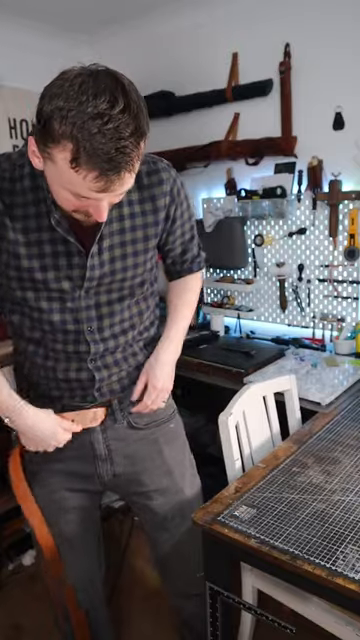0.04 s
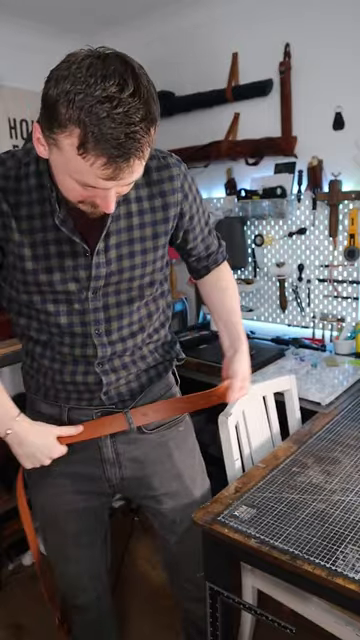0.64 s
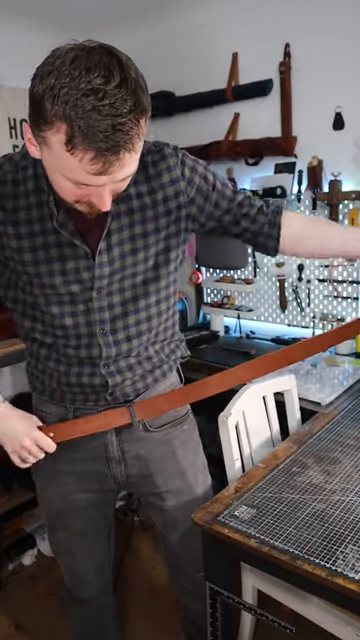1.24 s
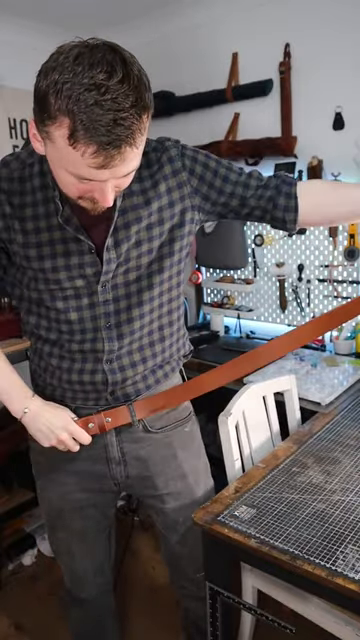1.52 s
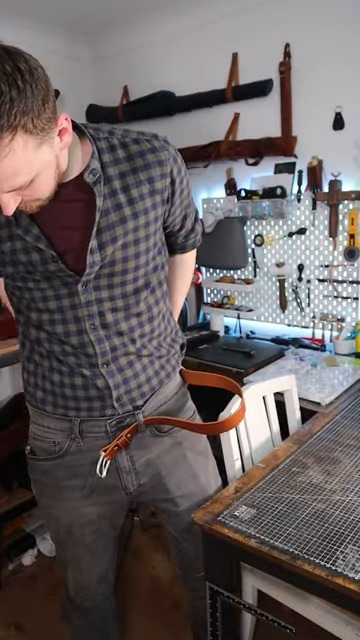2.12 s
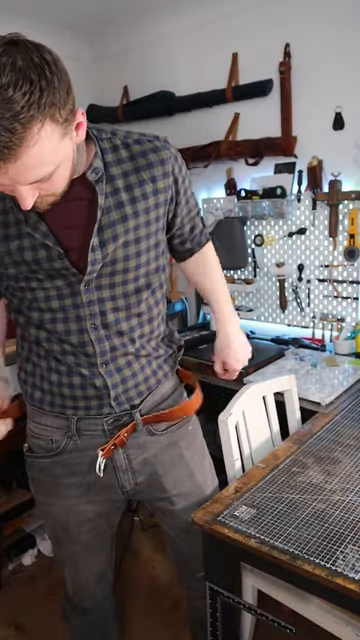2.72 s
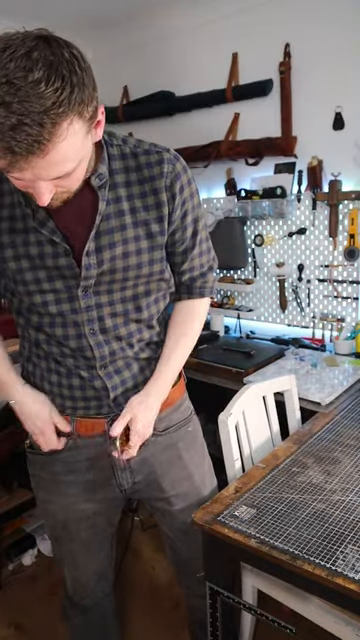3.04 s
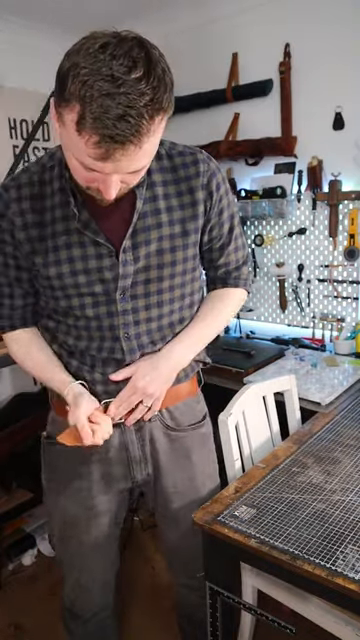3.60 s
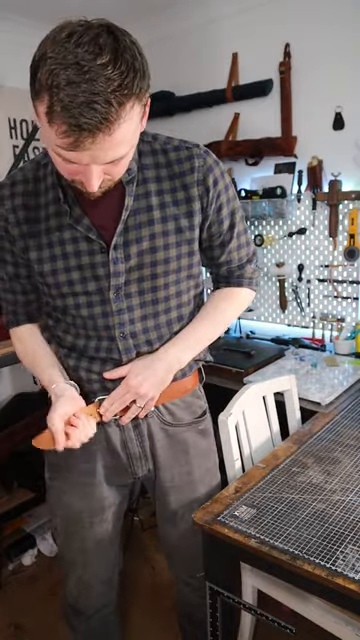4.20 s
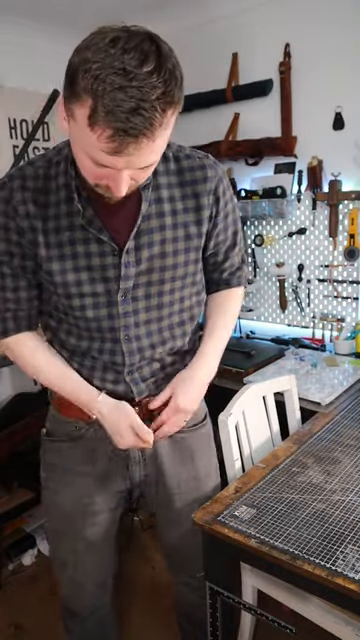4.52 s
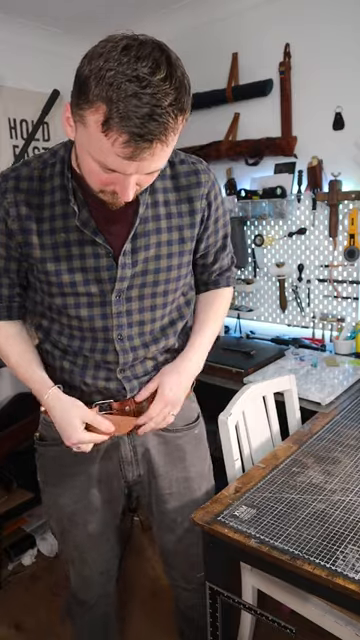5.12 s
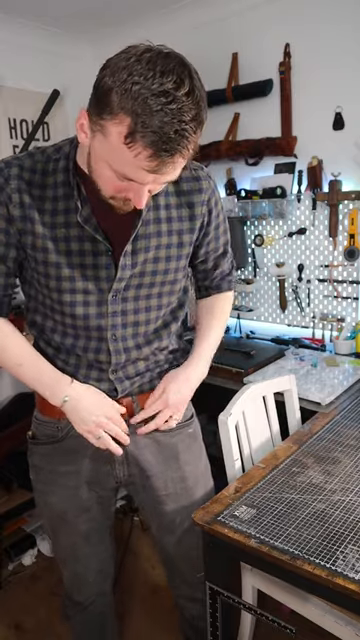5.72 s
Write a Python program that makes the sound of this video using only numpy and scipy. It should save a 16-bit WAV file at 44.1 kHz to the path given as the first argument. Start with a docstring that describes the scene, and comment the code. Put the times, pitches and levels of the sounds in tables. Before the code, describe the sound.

A leather belt swishes through the loops of jeans, its buckle clinking, then creaks as it is pulled tight.

```python
"""A leather belt is threaded through a pair of jeans and buckled, in a small, quietly humming workshop.
First hands brush the cloth, then the strap swishes and zips over the ribbed denim. Around one second
in, the dangling buckle clinks against its prong. More pulls follow, with soft pats and snaps of
leather. Around four seconds the belt is pulled tight: it sticks and slips in a run of creaks, and
the buckle clinks again. A few last pats, brushes and creaks end the scene."""
import sys
import numpy as np
from scipy import signal
from scipy.fft import rfft, irfft
from scipy.io import wavfile

SR = 44100
rng = np.random.default_rng(int(sys.argv[2]) if len(sys.argv) > 2 else 0)


def master(y):
    """Save y as 16-bit WAV."""
    cut = np.clip(np.atleast_2d(y).T, -1, 1)
    pcm = np.round(cut * 32767)  # scale
    wavfile.write(sys.argv[1], SR, pcm.astype(np.int16))


N = 253575
TIME = np.arange(N) / SR


def from_db(db):
    """Turn decibels into a number to multiply a sound by."""
    return 10 ** (np.asarray(db) / 20)


def rms_one(x):
    """Scale a signal so that its average size (rms) is 1."""
    return x / np.sqrt(np.mean(x ** 2) + 1e-20)


def at_hz(points, hz):
    """Read between the rows of a (pitch, value) table, with octaves evenly spaced."""
    known_hz, values = np.transpose(points)
    return np.interp(np.log(hz + 1e-9), np.log(known_hz), values)


def coloured(x, spectrum):
    """Shape the lows and highs of a signal by a (pitch, level) table; the result has rms 1."""
    gain = from_db(at_hz(spectrum, np.fft.rfftfreq(N, 1 / SR)))
    return rms_one(irfft(rfft(x) * gain, N))


def band(x, low_hz, high_hz, order=2):
    """Keep the part of a sound that lies between two pitches."""
    edges_hz = [low_hz, min(high_hz, SR * 4 / 9)]
    return signal.sosfilt(signal.butter(order, edges_hz, "band", fs=SR, output="sos"), x)


def drift(per_s):
    """A random wobble of rms 1 that heads for a new value per_s times a second."""
    return rms_one(np.interp(TIME * per_s, np.arange(N), rng.standard_normal(N)))


def add(track, start_s, sound):
    """Mix a sound into a track at the given time."""
    at = int(round(start_s * SR))
    track[at:at + len(sound)] += sound[:N - at]


def quiet_room(air_db, waver_db):
    """Something electrical hums, wavering a little, over the steady noise of the air."""
    # Tone colour of the air noise: pitch_hz, level_db
    air_spectrum = [(20, -19), (45, -14), (70, -0.5), (100, 10), (160, 6), (300, 4), (600, -0.5),
                    (1200, -8.5), (2400, -8.5), (3300, -6.5), (5000, -13), (10000, -22), (16000, -33)]
    # Tones of the electrical hum: pitch_hz, level_db
    hum_tones = [(115.2, -69.5), (161, -81.5), (231.5, -80)]
    swell_db = waver_db * drift(10)
    sway = .3 * drift(3)
    hum = sum(from_db(db + swell_db) * np.sqrt(2) * np.sin(2 * np.pi * hz * TIME + sway)
              for hz, db in hum_tones)
    return hum + from_db(air_db) * coloured(rng.standard_normal(N), air_spectrum)


def workshop_echo(x, gap_s, early_db, early_fade_s):
    """The nearby bench and walls throw back many quick echoes; high pitches die away first."""
    # Time the room's echo takes to fall by 60 dB: pitch_hz, fade_s
    fade_times = [(100, 1), (1000, 0.31), (3500, 0.25), (8000, 0.22), (16000, 0.16)]
    centres_hz, fades_s = np.transpose(fade_times)
    t = TIME[:SR // 2]
    scatter = rfft(rng.standard_normal(len(t)))
    hz = np.fft.rfftfreq(len(t), 1 / SR)
    early = from_db(early_db - 60 * t / early_fade_s)
    echo = np.zeros(len(t))
    for share, fade_s in zip(np.eye(len(fades_s)), fades_s):
        weight = at_hz(np.c_[centres_hz, share], hz)   # picks out one range of pitches
        echo += irfft(scatter * weight, len(t)) * (from_db(-60 * t / fade_s) + early)
    echo *= np.clip(t / gap_s - 1, 0, 1)   # silent until the first echo is back
    return signal.fftconvolve(x, echo / np.sqrt(np.sum(echo ** 2)))[:N]


def pats(spread):
    """A soft pat crushes the cloth and makes a dull puff that dies quickly."""
    # Hand and strap landing on the body: start_s, level_db, pitch_hz, fade_s (to fall by 60 dB)
    touches = [(.457, -48.5, 580, .08), (.515, -57, 450, .05), (.935, -49, 150, .15), (1.141, -56, 330, .2),
               (2.712, -48, 1300, .14), (2.915, -43, 580, .08), (2.926, -51, 250, .13),
               (3.251, -53, 500, .05), (3.385, -50.5, 750, .09), (5.501, -52, 800, .05),
               (5.526, -47, 700, .06), (5.545, -50, 700, .08), (5.673, -55, 550, .08)]
    out, t = np.zeros(N), TIME[:SR // 2]
    fade_in = 1 - np.exp(-t / 0.001)
    for start_s, level_db, hz, fade_s in touches:
        puff = rms_one(band(rng.standard_normal(len(t)), hz / spread, hz * spread))
        add(out, start_s, from_db(level_db - 60 * t / fade_s) * puff * fade_in)
    return out


def stroke(peak_s, rise_s, fall_s, edge_db=12):
    """Loudness of one movement that speeds up and slows down; edge_db lower at both ends."""
    before = (np.maximum(peak_s - TIME, 0) / rise_s) ** 1.56   # a power of 2 would give a bell shape
    after = (np.maximum(TIME - peak_s, 0) / fall_s) ** 1.31
    return from_db(-np.minimum(edge_db * (before + after), 120))


def friction_levels():
    """Levels of cloth, strap and weave in dB over time: every pull or brush stirs all three."""
    # The strap is pulled over the denim: peak_s, rise_s, fall_s, swish_db, hiss_db
    pulls = [(.57, .1, .1, -59.5, -68), (.77, 0.19, 0.28, -53.5, -48.5), (.93, 0.098, 0.17, -42.5, -53),
             (1.35, 0.078, 0.17, -53.5, -57.5), (1.56, .015, 0.13, -58, -66.5),
             (1.87, 0.068, .06, -61, -67.5), (2.23, 0.06, 0.034, -61.5, -75),
             (2.465, 0.098, 0.066, -47, -58.5), (2.91, 0.13, 0.039, -48, -58),
             (2.99, 0.077, .012, -56.5, -60), (3.125, 0.029, 0.084, -54.5, -76),
             (3.605, 0.082, 0.077, -64.5, -62), (3.85, 0.091, .08, -61.5, -66), (4.35, .06, 0.24, -62, -86),
             (4.63, 0.041, 0.08, -58.5, -60.5), (5.555, 0.047, 0.067, -50.5, -74)]
    # Hands brush shirt and jeans: peak_s, rise_s, fall_s, rustle_db
    brushes = [(.09, .1, 0.11, -64), (.285, 0.066, 0.12, -55.5), (.39, 0.12, 0.18, -57.5),
               (.95, 0.11, 0.088, -50.5), (1.43, 0.36, 0.13, -62.5), (2.0, 0.064, 0.095, -61.5),
               (2.57, 0.071, 0.17, -65), (2.8, 0.14, .1, -65), (2.925, 0.016, 0.052, -48),
               (3.1, 0.04, .05, -58.5), (3.2, 0.096, 0.14, -57.5), (3.3, 0.027, 0.028, -59.5),
               (3.41, 0.11, 0.056, -60), (3.535, 0.055, 0.01, -56.5), (3.84, 0.052, 0.18, -60),
               (4.02, .04, 0.22, -68), (4.52, 0.17, 0.24, -64.5), (4.9, 0.11, 0.17, -75),
               (5.38, 0.27, 0.16, -65), (5.57, 0.066, 0.087, -61), (5.69, .02, 0.054, -59)]
    # each list of three levels runs: cloth rustle, strap swish, weave hiss
    movements = [(timing, [db - 11.5, db, hiss_db]) for *timing, db, hiss_db in pulls]
    movements += [(timing, [db, db - 1, db - 6]) for *timing, db in brushes]
    power = from_db([[-74], [-74.5], [-75]]) ** 2   # the clothes are never quite still
    for timing, levels_db in movements:
        power = power + np.outer(from_db(levels_db), stroke(*timing)) ** 2
    return 10 * np.log10(power)


def friction(spectrum, grain_db, grains_per_s, flutter_db):
    """Fibres catch and let go in tiny bursts, while the pressure of the hand flutters."""
    noise = rng.standard_normal(N)
    bursts_db = grain_db * np.minimum(drift(grains_per_s), 3)
    pressure_db = flutter_db * drift(70)
    return coloured(noise * from_db(bursts_db + pressure_db), spectrum)


def rubbing(crackle_db):
    """Loose cloth rustles low, the strap swishes through the loops and the weave hisses high."""
    # Tone colours of these three kinds of rubbing: pitch_hz, level_db
    cloth_tone = [(40, -19), (90, -7), (200, -2.5), (350, 1.5), (600, 2), (1100, 1.5), (1700, -3.5),
                  (3000, -22), (8000, -61)]
    strap_tone = [(300, -22), (900, -12.5), (1400, -2.5), (1900, -1.5), (2500, -1.5), (3300, -2.5),
                  (4100, -5.5), (5000, -10), (7000, -16), (16000, -32)]
    weave_tone = [(2000, -7.5), (4000, 4), (5500, -1), (7500, -0.5), (10000, -5), (13000, -8),
                  (16000, -11.5)]
    cloth_db, strap_db, weave_db = friction_levels()
    cloth = from_db(cloth_db + 0.02) * friction(cloth_tone, 2.5, grains_per_s=600, flutter_db=1.03)
    strap = from_db(strap_db - 2.5) * friction(strap_tone, 1.0, grains_per_s=1300, flutter_db=1.5)
    weave = from_db(weave_db - 1.6) * friction(weave_tone, 1.5, grains_per_s=4500, flutter_db=1.36)
    slips = (rng.random(N) < 90 / SR) * rng.standard_normal(N)   # about 90 a second
    # single slips stand out only while the strap creeps; at speed the swish covers them
    slip_db = np.minimum(strap_db, -59) + crackle_db
    crackle = from_db(slip_db) * rms_one(band(slips + 1e-18, 1440, 5900))
    return cloth + strap + weave + crackle


def zipping(jitter, octave_db, smear):
    """Denim ribs pass unevenly under the strap: a hissy tone, with a rougher one an octave up."""
    # The strap at full speed over the ribs: time_s, ribs_per_s, level_db
    slide = [(.58, 1650, -73), (.67, 1650, -63.5), (0.721, 1840, -59), (.775, 1890, -58), (0.82, 1700, -67),
             (.9, 1700, -70)]
    time_s, ribs_per_s, level_db = np.transpose(slide)
    pitch_hz = np.interp(TIME, time_s, ribs_per_s) * (1 + jitter * drift(1500))
    phase = 2 * np.pi * np.cumsum(pitch_hz) / SR
    loudness = np.interp(TIME, time_s, from_db(level_db), left=0, right=0)
    flicker = 1 + 0.16 * drift(280)
    octave = from_db(octave_db) * np.sin(2 * phase + smear * drift(1400))
    return loudness * flicker * (np.sin(phase) + octave)


def small_creaks(count, from_s, to_s):
    """Faint creaks come unevenly as the belt tightens; gives rows of start_s, level_db, pitch_hz."""
    time_luck, level_luck, pitch_luck = rng.standard_normal((count, 3)).T
    start_s = np.linspace(from_s, to_s, count) + time_luck * (to_s - from_s) / count / 2
    level_db = -47 + 2.0 * level_luck
    pitch_hz = 3700 * 2 ** (.2 * np.clip(pitch_luck, -2, 2))
    return list(zip(start_s, level_db, pitch_hz))


def creaks(spread, gain_db, edge_db):
    """Leather sticks, then slips in one very short jolt with a faint bright edge."""
    # Loud creaks and snaps over loops and buckle: start_s, level_db (before gain_db), pitch_hz
    loud_creaks = [(.4578, -39, 850), (2.4696, -33, 2980), (2.7068, -29, 1600), (3.2543, -42.5, 2300),
                   (3.828, -39, 3580), (3.837, -40.5, 1190), (3.8608, -35.5, 3200), (3.96, -38, 3034),
                   (4.0147, -45, 1010), (4.1778, -41, 2800), (4.2467, -44.5, 3200), (4.2786, -43, 3580),
                   (4.284, -43, 3800), (4.301, -37.5, 3470), (4.3283, -35, 3440), (4.3699, -40, 3870),
                   (4.4158, -31.5, 3670), (4.4559, -31.5, 3800), (4.6062, -34, 3600), (5.393, -39.5, 2030),
                   (5.5011, -34, 2400), (5.527, -35.5, 2520), (5.675, -41, 2700)]
    out, jolt = np.zeros(N), signal.unit_impulse(SR // 50)
    for start_s, level_db, hz in loud_creaks + small_creaks(count=16, from_s=3.66, to_s=4.68):
        body = band(jolt, hz / spread, hz * spread, order=3)
        snap = body + from_db(edge_db) * band(jolt, hz * 2, hz * 4)
        add(out, start_s, from_db(level_db + gain_db) * snap / np.abs(snap).max())
    return out


def buckle(boost_octaves, crack_db, crack_fade_s):
    """The prong hits the frame with a crack and both ring; leather and fingers can cut the ring short."""
    # Ringing tones of buckle and prong: pitch_hz, level_db, fade_s (to fall by 60 dB)
    metal_tones = [(2670, -9, 0.036), (2990, -4.5, 0.015), (3085, -3, 0.023), (3170, -3.5, 0.017),
                   (3510, -5.5, 0.033), (3900, -6.5, 0.036), (4120, -15, 0.096), (4800, -7.5, 0.023),
                   (6530, -23, 0.091), (7006, -8.5, 0.088), (8925, -8.5, 0.059), (11440, -19.5, 0.042),
                   (11130, -13, 0.029), (12120, -29, 0.031), (11900, -30.5, 0.071), (13640, -16, 0.061),
                   (15550, -22.5, .06)]
    # Hits of the prong; the spot that is struck boosts the tones near one pitch:
    # start_s, level_db, brightness_db_per_octave, boost_hz, boost_db, ring_scale (multiplies fade_s)
    hits = [(0.107, -54, 6, 11960, 1, 1.1), (0.903, -32, 3, 13120, 9, 0.44),
            (0.9356, -29.5, 8, 11100, 5.5, 0.46), (0.969, -45, 12, 8925, 1, 1.1),
            (1.058, -57, 8, 10890, 21.5, 1.1), (1.1313, -36, 5.5, 2603, 20, .5),
            (1.1408, -24.5, -1, 3007, 10.5, 0.48), (1.152, -28.5, 9.5, 7200, 6.5, 0.48),
            (1.3461, -35.5, 0.5, 4020, 13, 0.61), (1.3542, -42, 11.5, 8800, 6.5, 1.3),
            (1.4759, -45, 7, 12800, 11, 0.33), (1.498, -57.5, -8.5, 3740, 16, 0.55),
            (1.6347, -46, 4.5, 15400, 18, .25), (4.458, -48.5, -7, 14000, 8, .1),
            (4.5527, -42, 3.5, 2720, 17, 0.24), (4.6054, -46.5, -2.5, 3570, 17, 0.18)]
    out, t = np.zeros(N), TIME[:SR // 3]
    hz, tone_db, fade_s = np.transpose(metal_tones)
    fade_in = 1 - np.exp(-t / 0.00016)
    for start_s, level_db, brightness, boost_hz, boost_db, ring_scale in hits:
        fades = from_db(-60 * t / (ring_scale * fade_s[:, None]))
        rings = np.sin(2 * np.pi * hz[:, None] * t) * fades
        nearness = np.exp(-.5 * (np.log2(hz / boost_hz) / boost_octaves) ** 2)
        strength_db = tone_db + brightness * np.log2(hz / 7000) + boost_db * nearness
        strength = from_db(strength_db + rng.normal(0, 1, len(hz)))
        crack = band(rng.standard_normal(len(t)) * from_db(-60 * t / crack_fade_s), 1900, 12000)
        signs = rng.choice([-1, 1], len(hz))
        clink = (strength * signs) @ rings + from_db(crack_db) * crack
        add(out, start_s, from_db(level_db) * clink * fade_in)
    return out


def scene():
    """Belt, buckle and hands about a metre away, each with its share of echo, over the room's hum."""
    rub = rubbing(crackle_db=-12) + zipping(jitter=0.02, octave_db=9.5, smear=1.2)
    metal = buckle(boost_octaves=0.074, crack_db=-4.5, crack_fade_s=0.019)
    leather = creaks(spread=1.494, gain_db=-2.5, edge_db=-23)
    hands = from_db(3.5) * pats(spread=1.57)
    to_walls = from_db(-13.0) * (rub + hands) + from_db(-1.0) * metal + from_db(-4.0) * leather
    echo = workshop_echo(to_walls, gap_s=0.0017, early_db=1.0, early_fade_s=0.026)
    background = quiet_room(air_db=-66.5, waver_db=3.0)
    return (rub + metal + leather + hands + echo + background)[None]


def record(dry):
    """The microphone's small opening lifts the pitches near peak_hz; the very highest are cut off."""
    peak_hz, cutoff_hz = 3200, 15900
    b, a = signal.iirpeak(peak_hz, 4.5, fs=SR)
    lifted = dry + from_db(-1.0) * signal.lfilter(b, a, dry)
    return signal.sosfilt(signal.ellip(12, .1, 80, cutoff_hz, fs=SR, output="sos"), lifted)


dry = scene()
out = record(dry)
master(out)
```